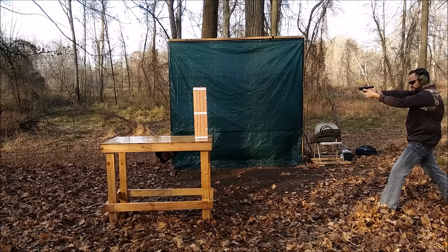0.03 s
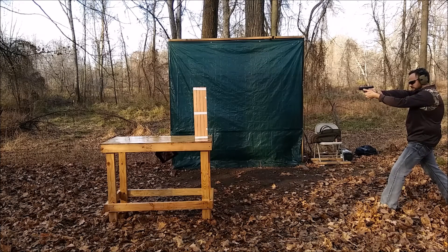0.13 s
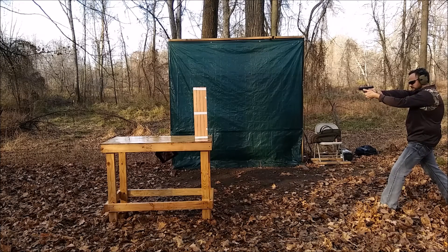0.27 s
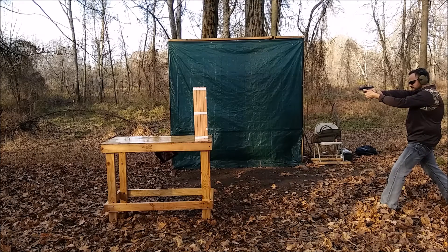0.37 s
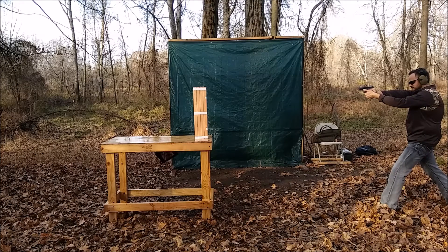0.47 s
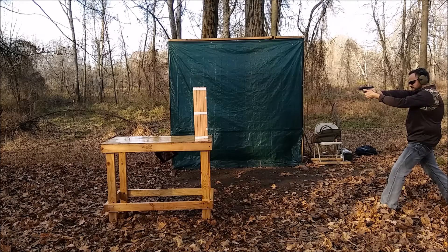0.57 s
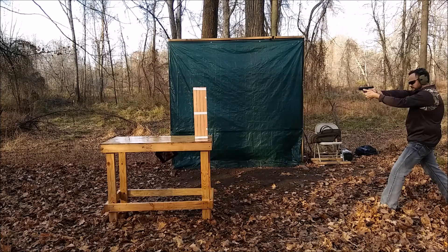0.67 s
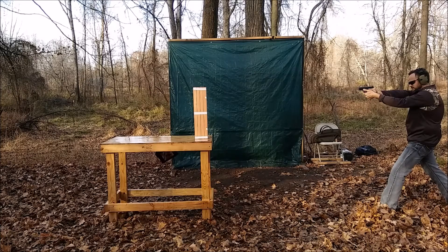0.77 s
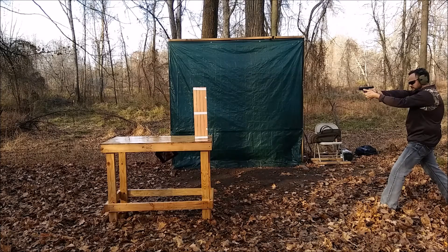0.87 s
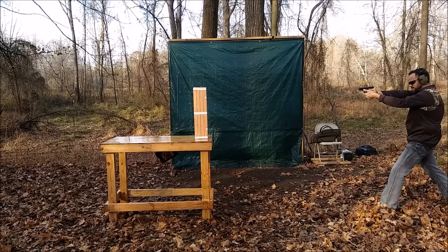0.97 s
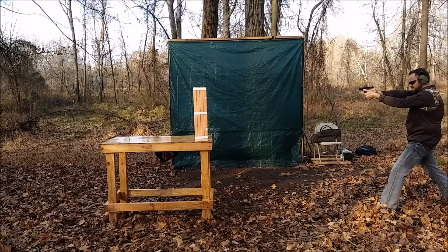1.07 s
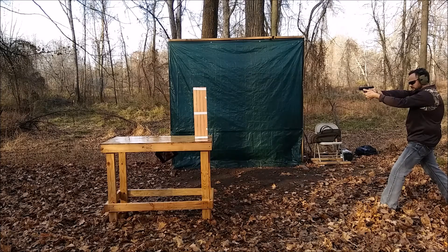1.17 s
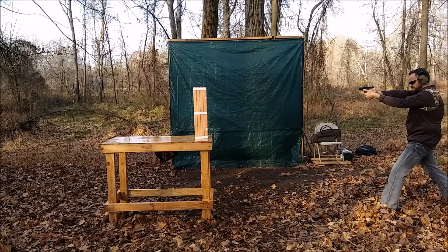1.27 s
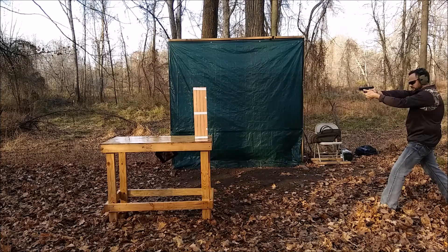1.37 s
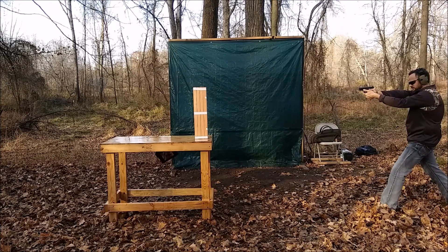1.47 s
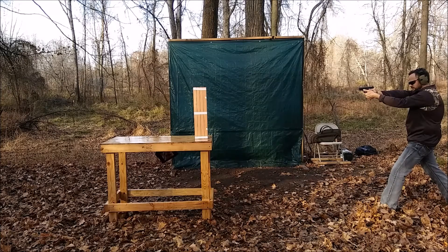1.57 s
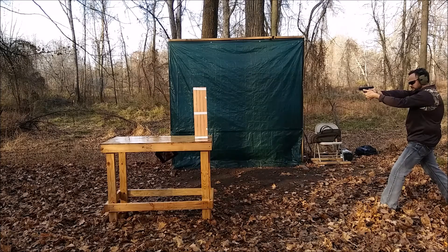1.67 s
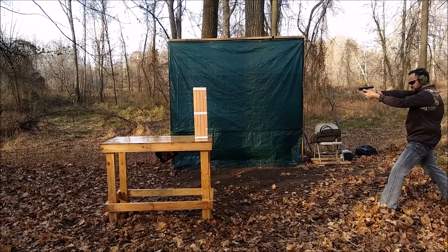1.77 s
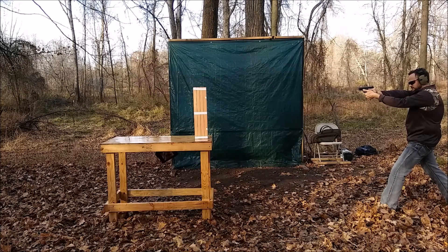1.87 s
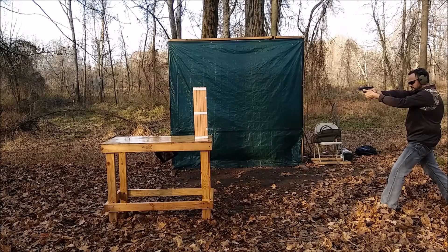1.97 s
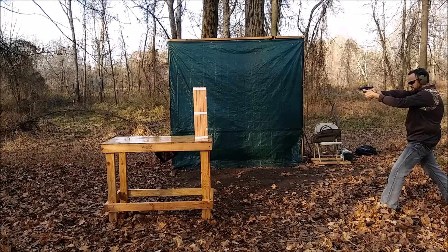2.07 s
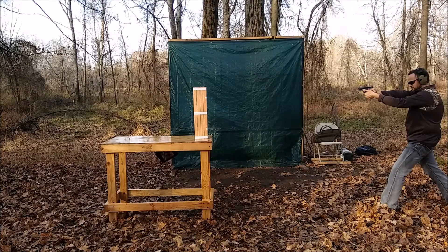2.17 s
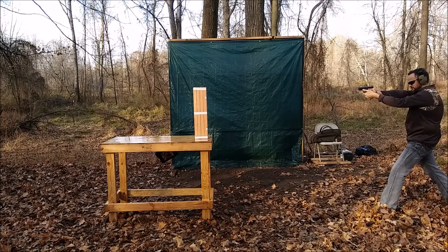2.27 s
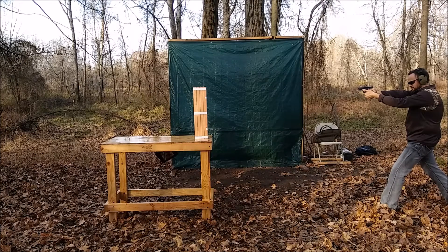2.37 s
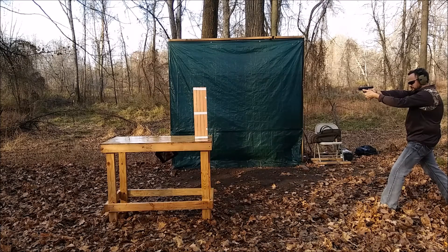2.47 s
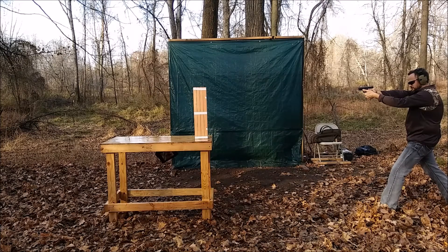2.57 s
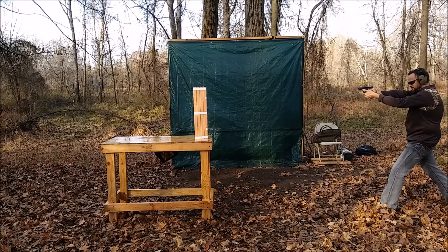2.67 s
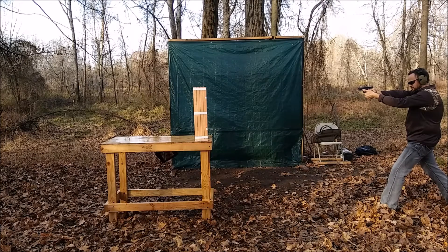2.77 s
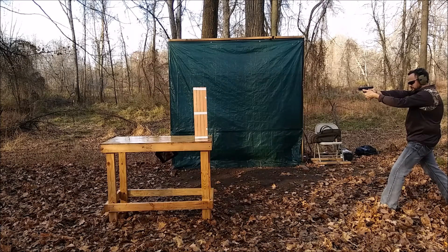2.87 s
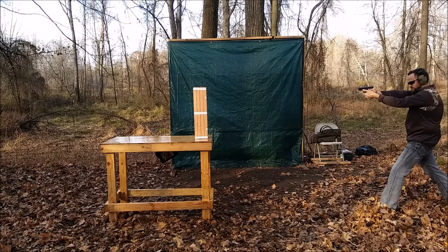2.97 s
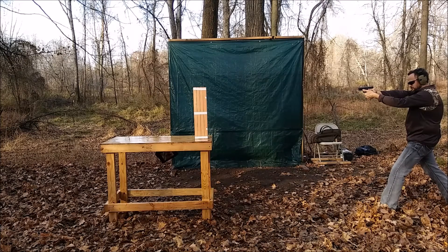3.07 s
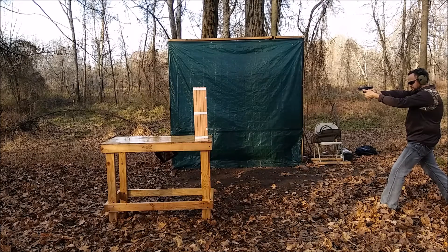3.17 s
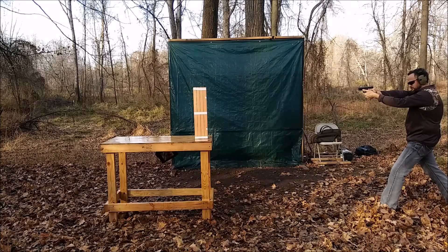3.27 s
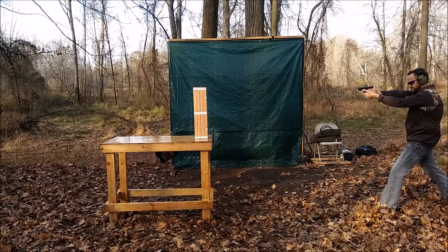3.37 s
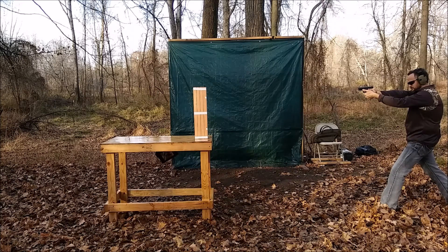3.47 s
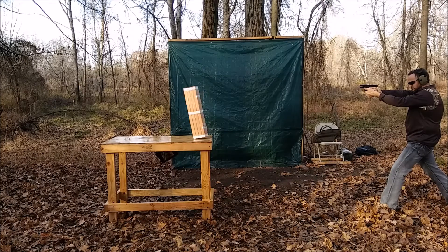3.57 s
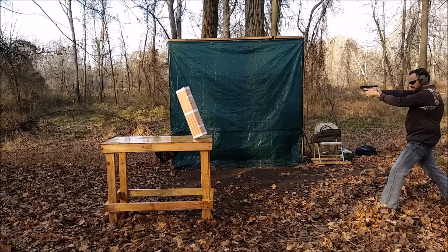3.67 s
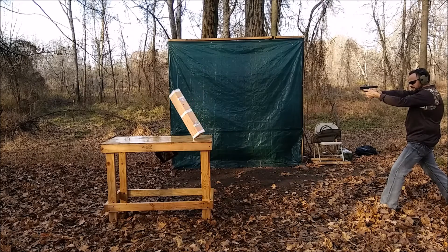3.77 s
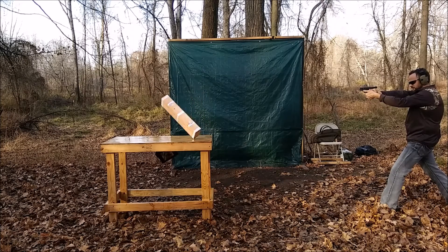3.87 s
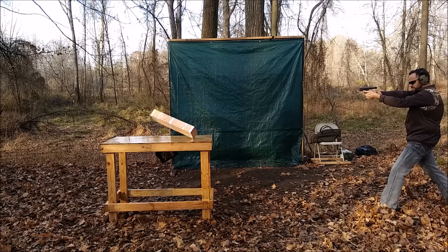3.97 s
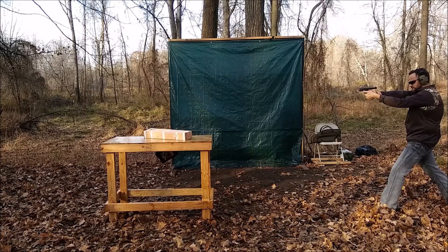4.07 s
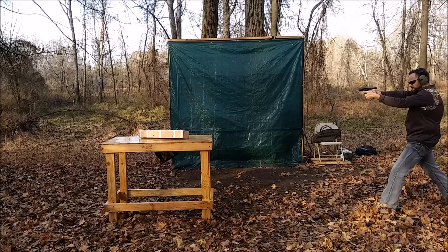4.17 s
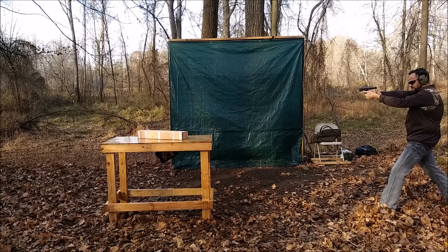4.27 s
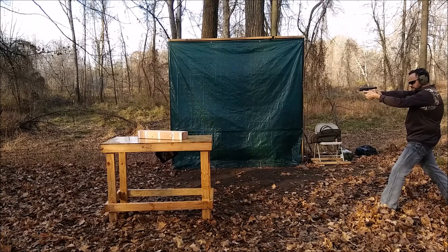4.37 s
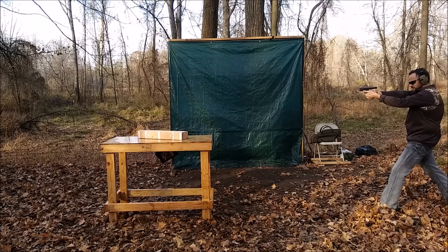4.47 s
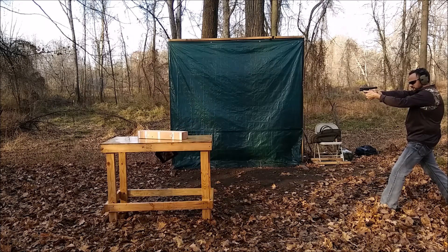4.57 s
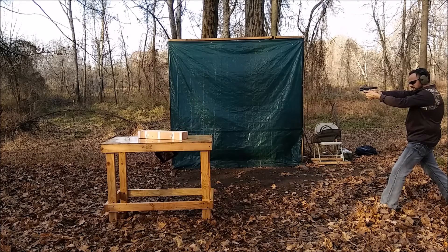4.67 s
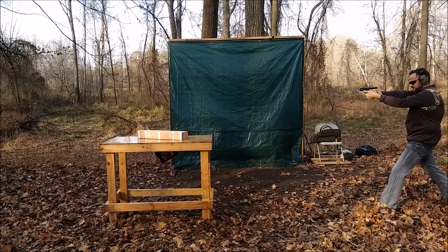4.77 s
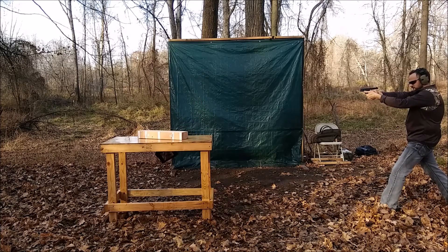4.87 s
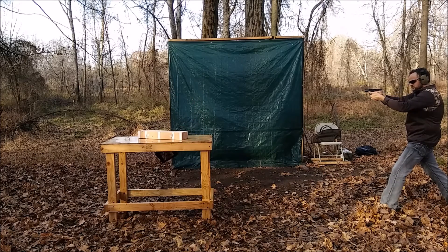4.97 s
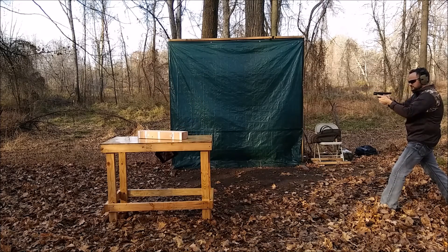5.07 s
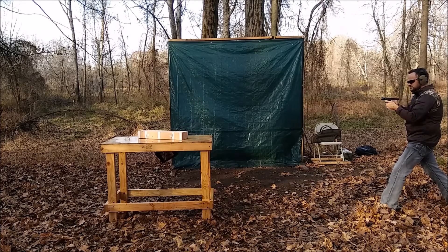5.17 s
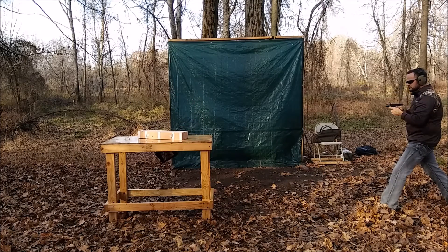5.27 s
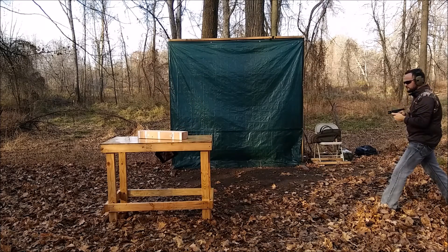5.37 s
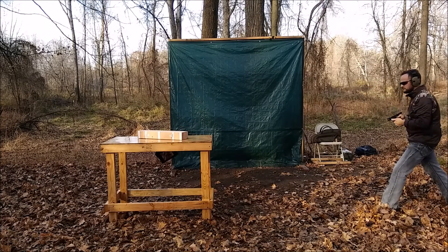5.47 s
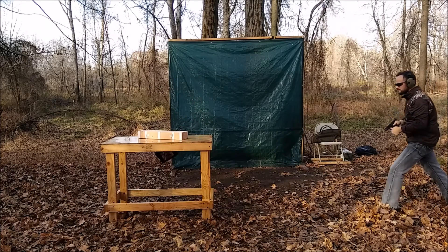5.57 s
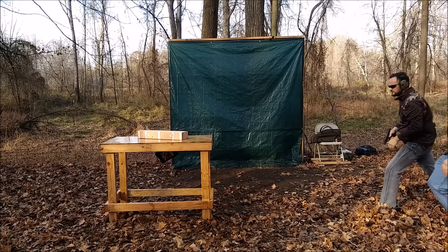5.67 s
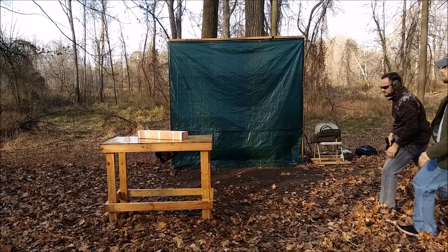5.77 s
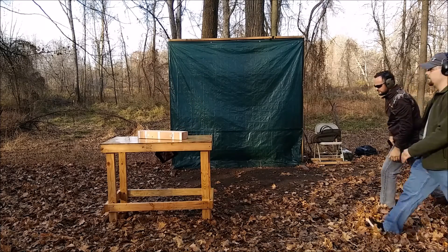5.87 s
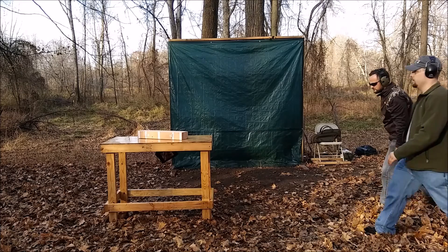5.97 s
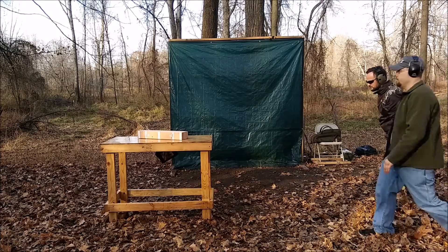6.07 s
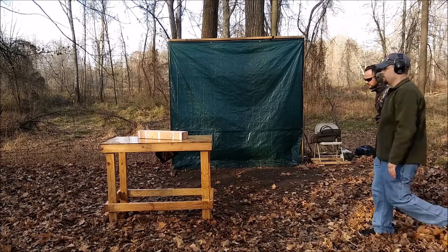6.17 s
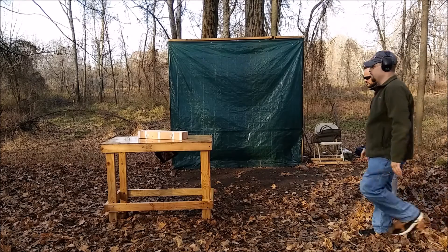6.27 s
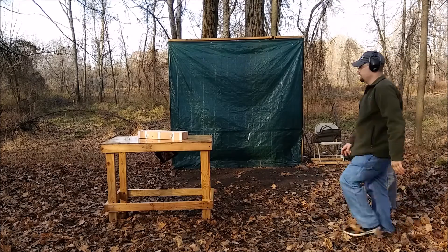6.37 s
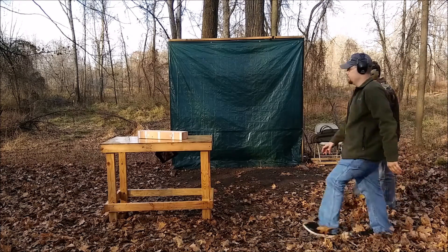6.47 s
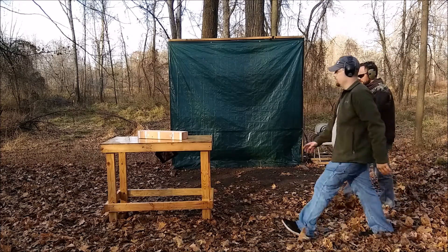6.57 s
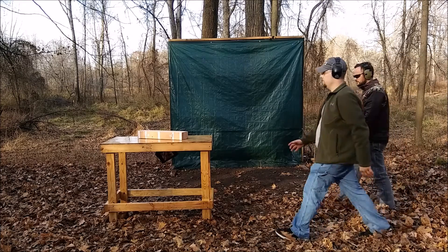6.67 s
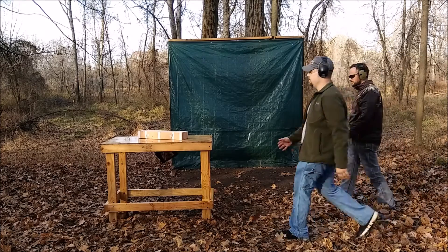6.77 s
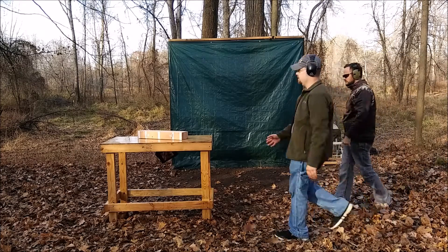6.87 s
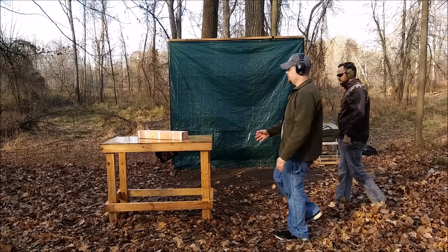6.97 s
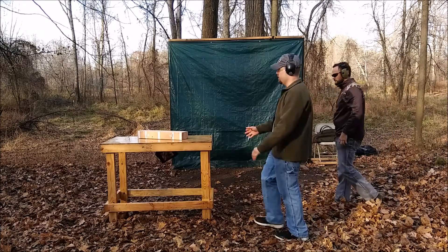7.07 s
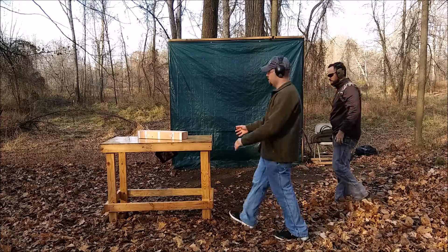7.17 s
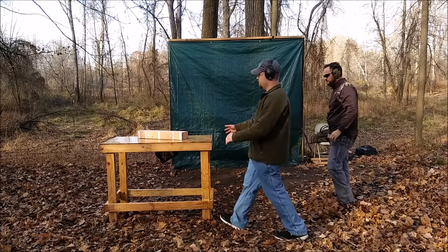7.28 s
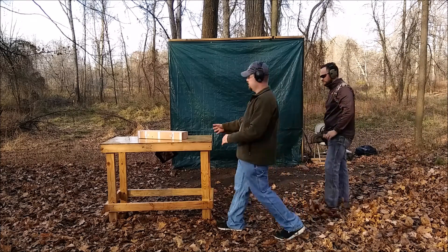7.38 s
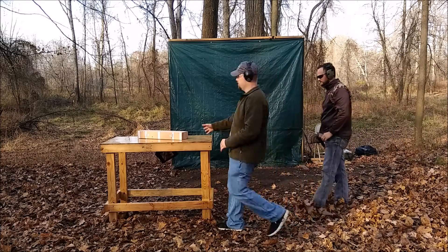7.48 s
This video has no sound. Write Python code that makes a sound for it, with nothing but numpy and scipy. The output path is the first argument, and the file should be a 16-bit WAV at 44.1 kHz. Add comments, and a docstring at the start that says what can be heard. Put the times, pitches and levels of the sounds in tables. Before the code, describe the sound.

From 0 to 3.6 seconds a woodland clearing is almost silent: low air noise and hiss, a very faint thin electronic whine, and light gusts stirring dry leaves into tiny ticks, slightly busier around 2.5 to 3.1. At 3.62 one pistol shot explodes, a hard bright crack that overloads the nearby microphone, with immediate slaps from close surfaces and a short low boom. Trees return a dense noisy echo, growing duller as it fades over the next couple of seconds. At 4.19 a bundle of boards lands on a wooden table with a sharp clack, quick rattling bounces and softer thumps until about 4.45. A faint far roll swells near 5.4 and dies away. From 4.7 feet shift in dry leaves with a snap at 4.78; from 5.9 steps grow fuller, swishing and crunching, with bright snaps around 6.4 to 6.9, continuing to the end near 7.5.

```python
"""One pistol shot in a woodland clearing: noise bursts overload a nearby microphone.
Trees scatter the blast back as decaying noise, duller with delay; a far slope returns a soft roll.
The bundle of boards that was hit topples onto a wooden table and bounces: contact noise plus dying modes.
Then two people walk through dry leaves: swelling noise, short resonant crackles and snapping stalks.
Quiet air, light gusts (noise and random clicks) and a thin electronic whine lie underneath."""
import sys
import numpy as np
from scipy import signal
from scipy.fft import rfft, irfft
from scipy.io import wavfile

SR = 44100
rng = np.random.default_rng(int(sys.argv[2]) if len(sys.argv) > 2 else 0)


def inscribe(sig):
    """Save sig as 16-bit PCM at rate SR to the path in sys.argv[1].

    A 1-D sig is mono; a 2-D sig holds one channel per row.
    Samples are clipped to [-1, 1] before scaling.
    """
    pcm = np.round(np.clip(np.atleast_2d(sig).T, -1, 1) * 32767)
    wavfile.write(sys.argv[1], SR, pcm.astype(np.int16))


N = 332514
T, HZ = np.arange(N) / SR, np.fft.rfftfreq(N, 1 / SR)
SHOT_S = 3.6195


def amp(db):
    """Decibels to gain."""
    return 10 ** (np.asarray(db) / 20)


def unit(x):
    """Scales to rms 1."""
    return x / np.sqrt(np.mean(x ** 2) + 1e-20)


def at_hz(points, hz):
    """Reads a spectrum on a log-frequency axis."""
    f, value = np.transpose(points)
    return np.interp(np.log(hz + 1), np.log(f), value)


def colour(x, spectrum):
    """Filters x by a spectrum, then scales to rms 1."""
    return unit(irfft(rfft(x) * amp(at_hz(spectrum, HZ)), N))


def noise(spectrum):
    """Steady coloured noise, rms 1."""
    return colour(rng.standard_normal(N), spectrum)


def drift(per_s):
    """Slow random wander, rms 1."""
    return unit(irfft(rfft(rng.standard_normal(N)) * np.exp(-(HZ / per_s) ** 2), N))


def burst(s, decay_s):
    """Sudden start at s, exponential fall."""
    return (T >= s) * np.exp(-np.maximum(T - s, 0) / decay_s)


def swell(s, rise_s, hold_s, decay_s):
    """Grows exponentially up to s, holds, then dies away."""
    before = np.maximum(s - T, 0)
    after = np.maximum(T - s - hold_s, 0)
    return np.exp(-before / rise_s - after / decay_s)


def together(gains):
    """Unrelated noises add in power."""
    return np.sqrt(sum(gain ** 2 for gain in gains))


def low_cut(x, hz):
    """Fourth-order high-pass: weak radiation of bass."""
    return signal.sosfilt(signal.butter(4, hz, "highpass", fs=SR, output="sos"), x)


def grains(per_s, spread_db):
    """Random clicks, mostly small and a few large, rms 1."""
    size = amp(spread_db * np.minimum(rng.exponential(1, N), 4))
    hits = rng.random(N) < per_s / SR
    return unit(size * rng.standard_normal(N) * hits)


def add(mix, s, sound):
    """Mixes a sound in at s, in place."""
    part = mix[round(s * SR):][:len(sound)]
    part += sound[:len(part)]


def ring(modes, t, vary_db):
    """Dying modes; each blow lands elsewhere and weights them differently."""
    hz, db, t60_s = np.transpose(modes)[:, :, None]
    weight = rng.choice([-1, 1], hz.shape) * amp(vary_db * rng.standard_normal(hz.shape))
    partials = weight * amp(db - 60 * t / t60_s) * np.sin(2 * np.pi * hz * t)
    return partials.sum(0) / np.linalg.norm(amp(db))


# still woods and microphone hiss: (frequency [Hz], relative density [dB per Hz])
AIR_SPECTRUM = [(15, -60), (25, -24.5), (32, -20), (59, -3.5), (75, 2.5), (107, -3), (204, -6), (281, -4.5),
                (313, -5.5), (509, -7.5), (2770, -17.5), (7300, -21), (7910, -17.5), (9050, -29),
                (15500, -19.5)]
AIR_DB = -59


def air():
    """Steady coloured noise whose level wanders slightly."""
    return amp(AIR_DB) * noise(AIR_SPECTRUM) * amp(0.5 * drift(per_s=3.2))


WHINE_HZ, WHINE_WIDTH_HZ, WHINE_DB = 8000, 74, -70


def whine():
    """Narrow whine of the electronics: noise in one sharp resonance."""
    resonance = 1 / (1 + ((HZ - WHINE_HZ) / WHINE_WIDTH_HZ) ** 2)
    return amp(WHINE_DB) * unit(irfft(rfft(rng.standard_normal(N)) * resonance, N))


# gusts before the shot: (time [s], stirred leaves level [dB], low rush level [dB])
GUSTS = [(.3, -70, -77), (.88, -66, -60.5), (1.5, -70, -68), (1.9, -77, -63), (2.56, -63, -62),
         (2.82, -62.5, -66), (3.12, -68, -62)]
GUST_RISE_S, GUST_HOLD_S, GUST_DECAY_S = 0.055, 0.04, 0.064
STIR_DB = -73  # constant stirring beneath the gusts
# dry leaves, here and underfoot: (frequency [Hz], relative density [dB per Hz])
LEAF_SPECTRUM = [(59, -40.5), (100, -18.5), (188, -17), (243, -12.5), (601, -12.5), (1160, -8.5),
                 (1660, -6), (2370, -7.5), (4370, -3.5), (6000, 0), (7250, -1), (8410, -10.5),
                 (10800, -12.5), (15500, -18.5)]


def wind():
    """Each gust swells a low rush of air and stirs leaves into many small clicks."""
    rush_spectrum = [(50, -17.5), (200, 1), (800, 1.5), (1500, -11), (5000, -28)]
    rush_gain, stir_gains = 0, [amp(STIR_DB)]
    for s, leaves_db, rush_db in GUSTS:
        gust = swell(s, GUST_RISE_S, GUST_HOLD_S, GUST_DECAY_S)
        rush_gain = rush_gain + amp(rush_db) * gust
        stir_gains.append(amp(leaves_db) * gust)
    rush = noise(rush_spectrum) * rush_gain
    stir = colour(grains(per_s=980, spread_db=2), LEAF_SPECTRUM) * amp(2 * drift(per_s=20))
    return rush + stir * together(stir_gains)


# leaves and twigs snapping: (time [s], peak level [dB], resonance [Hz])
SNAPS = [(0.6015, -53, 3600), (1.395, -44, 6900), (1.4641, -46, 5000), (1.8183, -46, 3500),
         (1.9939, -48, 5000), (2.5391, -51, 7900), (3.0769, -51.5, 7700), (4.778, -22, 5330),
         (5.632, -26, 6460), (6.414, -20.5, 6200), (6.52, -28, 5840), (6.584, -20, 5500),
         (6.729, -27.5, 6100), (6.895, -34, 5860)]


def snaps():
    """A stalk breaks: a few milliseconds of noise in a broad resonance."""
    out, t = np.zeros(N), T[:SR // 20]
    for s, peak_db, hz in SNAPS:
        body = signal.iirpeak(hz, 1.8, fs=SR)
        snap = rng.standard_normal(len(t)) * np.exp(-t / 0.0029)
        for _ in range(2):
            snap = signal.lfilter(*body, snap)
        add(out, s, amp(peak_db) * snap / abs(snap).max())
    return out


LEAF_RANGE_HZ, LEAF_Q = (1800, 11000), 5.4


def crackles():
    """Leaves of different sizes snap in clumps, each size at its own pitch."""
    out = np.zeros(N)
    for hz in np.geomspace(*LEAF_RANGE_HZ, num=12):
        clicks = grains(per_s=330, spread_db=1.5) * amp(2 * drift(per_s=27))
        out += signal.lfilter(*signal.iirpeak(hz, LEAF_Q, fs=SR), clicks)
    return unit(out)


# feet shifting, then stepping: (time of full pressure [s], rustle level before LEAF_GAIN_DB [dB],
# sweep-in [s], press [s], crush level [dB])
STEPS = [(4.76, -41.5, 0.13, 0.1, -66), (5.06, -42.5, 0.27, 0.057, -62), (5.28, -44.5, 0.19, 0.12, -47),
         (5.61, -43, 0.096, 0.035, -66.5), (5.92, -33, 0.053, 0.086, -53), (6.278, -39, 0.35, 0.068, -54),
         (6.45, -39.5, 0.087, 0.13, -45.5), (6.585, -35, 0.035, 0.0094, -51),
         (6.68, -41.5, 0.053, 0.083, -61), (6.88, -44, 0.22, 0.093, -56), (7.23, -47, 0.051, 0.057, -69),
         (7.35, -36, 0.11, .07, -60), (7.45, -34.5, 0.038, .08, -50)]
# dull crush of the leaf bed: (frequency [Hz], relative density [dB per Hz])
CRUSH_SPECTRUM = [(50, -21), (200, -2), (500, 5), (1000, 0.5), (1800, 2.5), (4000, -6.5), (12000, -35)]
SETTLE_S, CRUSH_DECAY_S = 0.072, 0.049
# light shuffling beneath the steps, held to the end; its level is also before LEAF_GAIN_DB
SHUFFLE_S, SHUFFLE_DB, SHUFFLE_RISE_S = 4.72, -48.5, 0.07
LEAF_GAIN_DB = 2.0


def footsteps():
    """Each foot sweeps in, presses, lets go: leaves swish and crackle over the dull crush of their bed."""
    sweep = together(amp(db) * swell(s, rise_s, press_s, SETTLE_S)
                     for s, db, rise_s, press_s, _ in STEPS)
    weight = together(amp(db) * swell(s, rise_s, press_s, CRUSH_DECAY_S)
                      for s, _, rise_s, press_s, db in STEPS)
    shuffle = amp(SHUFFLE_DB) * swell(SHUFFLE_S, SHUFFLE_RISE_S, T[-1], SETTLE_S)
    swish = rng.standard_normal(N) * amp(1 * drift(per_s=100))
    leaves = colour(swish + amp(-7) * crackles(), LEAF_SPECTRUM)
    rustle = amp(LEAF_GAIN_DB) * leaves * together([sweep, shuffle])
    return rustle + noise(CRUSH_SPECTRUM) * weight


# board contacts: (time [s], knock gain [dB], contact cut-off [Hz], table thump gain [dB])
KNOCKS = [(4.189, 0, 4460, -14), (4.196, -5, 2000, -11), (4.2188, -1.5, 3000, -16.5),
          (4.2226, -9, 4100, -25), (4.232, -8.5, 2520, -28), (4.3132, -8, 1600, -18),
          (4.356, -10.5, 880, -10.5), (4.366, -5.5, 1150, -10), (4.415, -13, 682, -23)]
# wood striking wood: (frequency [Hz], relative density [dB per Hz])
CLACK_SPECTRUM = [(200, -6), (1200, 6), (4000, 2), (7000, -1), (9000, -7), (15000, -8)]
# modes of the boards: (frequency [Hz], relative level [dB], t60 [s])
BOARD_MODES = [(364.6, -1, 0.11), (501, -3, 0.12), (599, -3.5, 0.15), (688, -6, 0.1), (755, 6.5, 0.067),
               (849, 0.5, 0.13), (920, -7.5, 0.094), (1000, -3, 0.058), (1244, 0.5, 0.023),
               (1440, -4, 0.089), (1770, -6.5, 0.03), (2360, -18, 0.02)]
# modes of the table: (frequency [Hz], relative level [dB])
TABLE_MODES = [(115, -10), (138, -10), (168, -2), (188, -3.5), (210, 3), (234, 0), (280, -13), (385, 1)]
TABLE_T60_S = 0.15  # damped by its legs in the soil


def knocks():
    """Each landing clacks, rings the boards and thumps the table."""
    out, t = np.zeros(N), T[:SR // 2]
    table = [(hz, db, TABLE_T60_S) for hz, db in TABLE_MODES]
    for s, knock_db, contact_hz, thump_db in KNOCKS:
        clack_decay = amp(4) * np.exp(-t / 0.00075) + amp(-5.5) * np.exp(-t / 0.011)
        clack = noise(CLACK_SPECTRUM)[:len(t)] * clack_decay
        contact = signal.butter(2, contact_hz, fs=SR)  # softer contact excites less treble
        knock = signal.lfilter(*contact, clack + amp(0.5) * ring(BOARD_MODES, t, vary_db=1.5))
        add(out, s, amp(knock_db) * low_cut(knock, hz=202))
        add(out, s, amp(thump_db) * low_cut(ring(table, t, vary_db=2.0), hz=117))
    return out


# bundle shuddering on the table: (frequency [Hz], relative density [dB per Hz])
SHUDDER_SPECTRUM = [(60, -32), (100, -20), (140, 1.5), (230, -1), (320, -7), (900, -16), (2200, -14),
                    (4500, -24.5), (12000, -52)]
SHUDDER_DB, SHUDDER_RISE_S, SHUDDER_HOLD_S, SHUDDER_DECAY_S = -22.5, 0.004, 0.13, 0.075


def shudder():
    """Low noise held from the second contact, dying as the bundle settles."""
    level = amp(SHUDDER_DB) * swell(KNOCKS[1][0], SHUDDER_RISE_S, SHUDDER_HOLD_S, SHUDDER_DECAY_S)
    return low_cut(noise(SHUDDER_SPECTRUM) * level, hz=108)


def boards(echo):
    """Knocks and shudder, convolved with the echo for a faint answer from the woods."""
    direct = knocks() + shudder()
    response = echo[round(SHOT_S * SR):] / np.linalg.norm(echo)
    return direct + amp(-28.0) * signal.fftconvolve(direct, response)[:N]


# near ground answers briefly, the treeline most, the deep woods go on answering
NEAR_DB, NEAR_DECAY_S, DEEP_DB = 3, 0.028, -7
TREELINE_DB, TREELINE_DELAY_S, TREELINE_OCTAVES = 5.5, 0.34, 1.65  # extra level, delay, spread


def reflectors():
    """Echo strength by delay: near ground, then the treeline, then the deep woods."""
    octaves = np.log2(np.maximum(T - SHOT_S, 1 / SR) / TREELINE_DELAY_S)
    trees = amp(DEEP_DB + TREELINE_DB * np.exp(-(octaves / TREELINE_OCTAVES) ** 2))
    return trees * (T >= SHOT_S) + amp(NEAR_DB) * burst(SHOT_S, NEAR_DECAY_S)


# echo before absorption: (frequency [Hz], relative density [dB per Hz])
WOODS_SPECTRUM = [(25, -22.5), (70, -14.5), (150, -14), (280, -6.5), (480, 2.5), (850, 2), (1300, -6),
                  (2000, -13), (3500, -9.5), (5500, -6), (7200, -8.5), (9500, -22), (15500, -39)]
# ground and air absorb bass and treble first: (frequency [Hz], t60 [s])
WOODS_T60 = [(30, 0.54), (90, 1.5), (200, 1.42), (450, 2.54), (800, 2.57), (1500, 2.59), (3000, 1.98),
             (5000, 1.395), (8000, 0.89), (11000, 0.66), (15500, .48)]


def woods():
    """Countless echoes from trunks and branches; the later ones have lost bass and treble."""
    echoes = colour(rng.standard_normal(N) * amp(1.0 * drift(per_s=90)), WOODS_SPECTRUM)
    hz, t, z = signal.stft(echoes, SR, nperseg=512)
    z = z * amp(-60 * np.maximum(t - SHOT_S, 0) / at_hz(WOODS_T60, hz)[:, None])
    return signal.istft(z, SR, nperseg=512)[1][:N] * reflectors()


# far roll: (frequency [Hz], relative density [dB per Hz])
ROLL_SPECTRUM = [(100, -39), (280, -17), (450, -5.5), (700, -0.5), (950, -7), (1400, -16), (3000, -26.5),
                 (8000, -80)]
ROLL_DELAY_S, ROLL_DB = 1.78, -40.5
ROLL_RISE_S, ROLL_HOLD_S, ROLL_DECAY_S = 0.3, 0.14, 0.53


def far_roll():
    """A far slope returns the blast late: it builds, holds and dies away."""
    envelope = swell(SHOT_S + ROLL_DELAY_S, ROLL_RISE_S, ROLL_HOLD_S, ROLL_DECAY_S)
    return noise(ROLL_SPECTRUM) * amp(ROLL_DB + drift(per_s=27)) * envelope


# blast thrown back by tarpaulin, table and near trunks: (delay [s], level [dB], decay time [s])
SLAPS = [(.014, 5, .02), (.036, -2, .02)]
# colour of the slaps: (frequency [Hz], relative density [dB per Hz])
SLAP_SPECTRUM = [(25, -12), (100, -22), (300, -7.5), (650, -2), (900, 3), (1200, -2.5), (1700, -11),
                 (5000, -22), (15000, -33)]


def slaps():
    """Near surfaces return short bursts of noise."""
    return noise(SLAP_SPECTRUM) * sum(amp(db) * burst(SHOT_S + delay_s, decay_s)
                                      for delay_s, db, decay_s in SLAPS)


# low boom: (frequency [Hz], relative density [dB per Hz])
BOOM_SPECTRUM = [(25, -8.5), (70, -17.5), (160, -4.5), (280, -2), (500, -10), (2000, -44)]


def boom():
    """Low noise rolls along the ground, starting with the first slap."""
    return amp(-11.5) * noise(BOOM_SPECTRUM) * burst(SHOT_S + SLAPS[0][0], decay_s=0.056)


# blast scattered by leafy ground close by: (frequency [Hz], relative density [dB per Hz])
CRACK_SPECTRUM = [(30, -24.5), (150, -27), (400, -15.5), (900, 3.5), (2000, -7.5), (4000, 2), (6200, 2.5),
                  (8500, -7.5), (16000, -26.5)]


def crack():
    """The blast: a bright front far above full scale and a longer, weaker tail."""
    front = amp(14) * burst(SHOT_S, decay_s=0.008)
    tail = amp(-2) * burst(SHOT_S, decay_s=0.084)
    return low_cut(noise(CRACK_SPECTRUM) * (front + tail), hz=249)


def shot():
    """The crack, its slaps off near surfaces, the low boom and the far roll."""
    return crack() + slaps() + boom() + far_roll()


def scene():
    """Everything at one microphone."""
    background = air() + wind() + whine()
    echo = woods()
    return (background + snaps() + footsteps() + boards(echo) + echo + shot())[None]


EDGE_HZ = 15800


def record(dry):
    """The input overloads with a firm knee; then a low-pass limits the band."""
    ceiling, knee = 0.9, 6
    clipped = dry / (1 + abs(dry / ceiling) ** knee) ** (1 / knee)
    low_pass = signal.firwin(401, EDGE_HZ, window=("kaiser", 8), fs=SR)
    return signal.oaconvolve(clipped, low_pass[None], "same")


dry = scene()
out = record(dry)
inscribe(out)
```